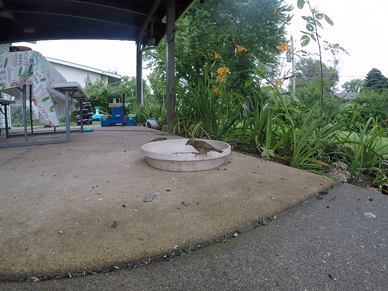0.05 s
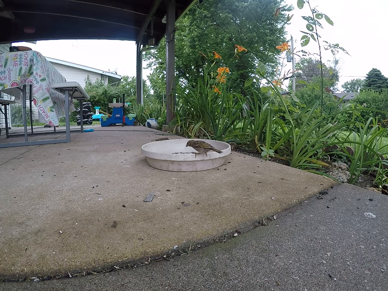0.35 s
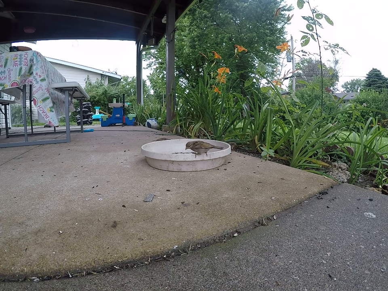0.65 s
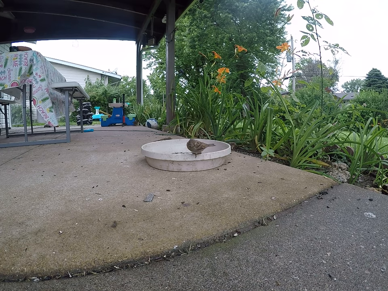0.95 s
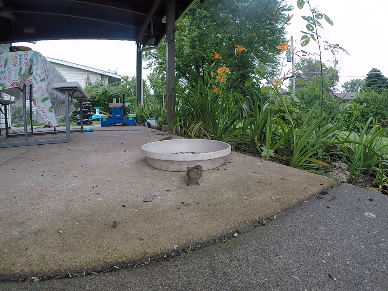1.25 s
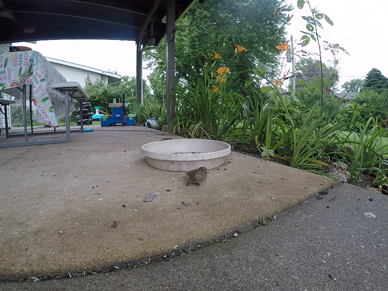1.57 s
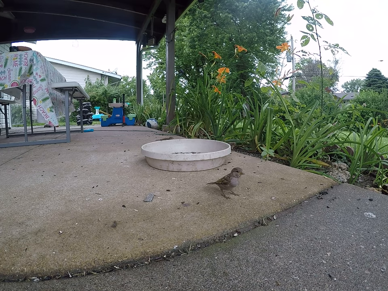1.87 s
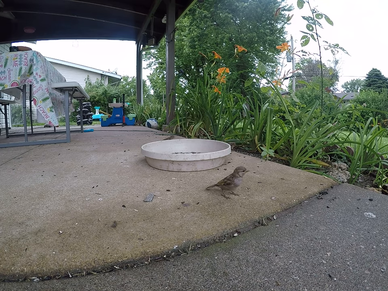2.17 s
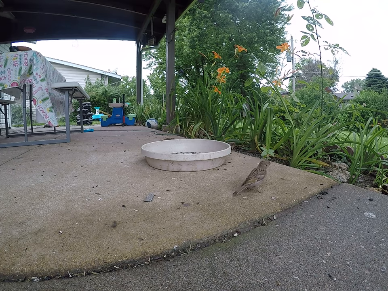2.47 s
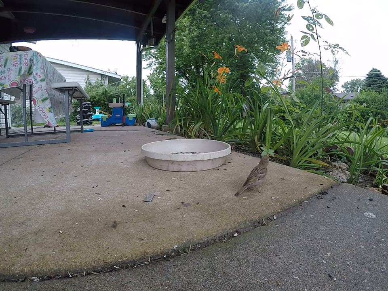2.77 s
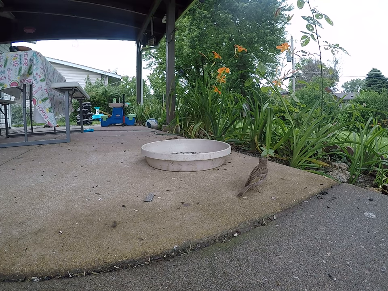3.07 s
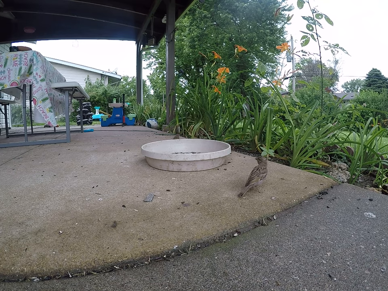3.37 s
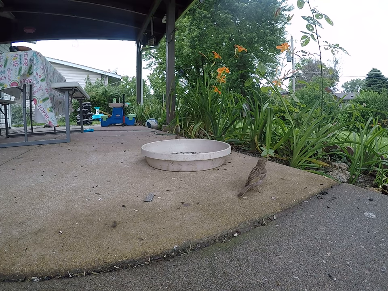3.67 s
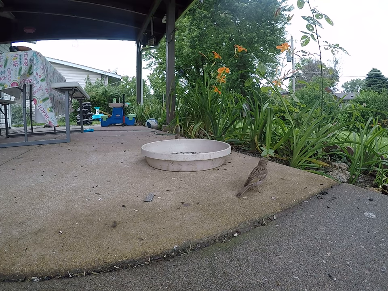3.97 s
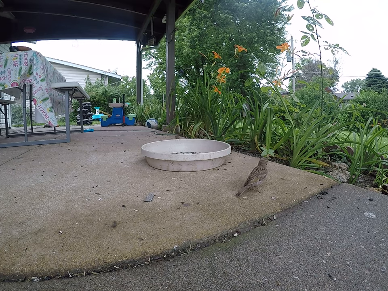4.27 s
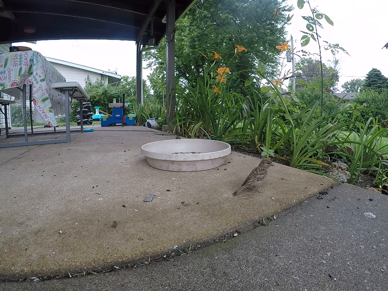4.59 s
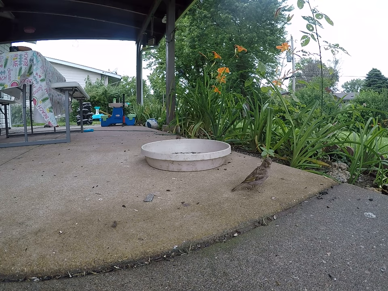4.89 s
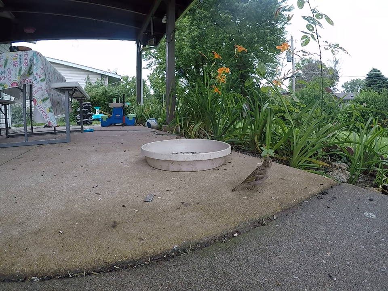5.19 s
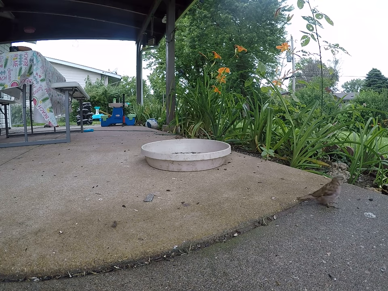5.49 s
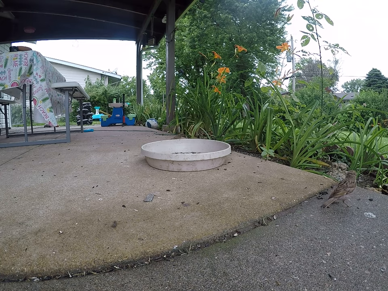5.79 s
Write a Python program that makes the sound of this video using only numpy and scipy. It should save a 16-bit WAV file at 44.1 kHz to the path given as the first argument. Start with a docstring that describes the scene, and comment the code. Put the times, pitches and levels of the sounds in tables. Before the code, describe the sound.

A steady low machine hum and a soft hiss of open air and distant traffic fill a roofed garden patio for about six seconds, with a faint, high electrical whine. Thin bird peeps come from the garden throughout. A small tick sounds at about 0.4 seconds. Sparrows chirp at 1.4 and 1.7 seconds, with a quick, feathery flutter of wings between them. At 1.9 seconds comes the loudest chirp, close and clear, slightly to the right. Softer, hoarser chirps follow at about 2.9, 3.9 and 4.6 seconds, each a tiny rasp and squeak running into a quick whistle. Soft knocks fall near 1.6, 2.7, 4.5 and 5.4 seconds, and another tick at 5 seconds. Faint wing flicks come around 4.4 and 5.5 seconds. The birds echo briefly off the concrete and roof.

```python
"""Sparrows chirp around a water dish on a roofed patio, one close by: the syrinx rasps, squeaks, then whistles
two quick arches while air hisses through the beak. Thinner calls glide in, most from the garden. A bird flicks
its wings in bursts of feather friction and scuffs once as it hops, among a few small ticks and soft knocks. All
these echo off slab, roof and walls. Under them lie a steady low machine hum, the hiss of open air and far
traffic, and a faint pulsing electrical whine."""
import sys
import numpy as np
from scipy import signal
from scipy.fft import rfft, irfft
from scipy.io import wavfile

SR = 44100
rng = np.random.default_rng(int(sys.argv[2]) if len(sys.argv) > 2 else 0)


def materialize(psi):
    """Save the field psi as 16-bit PCM at rate SR to the path in sys.argv[1].

    A 1-D psi becomes a single channel; in a 2-D psi each row is a channel.
    """
    bounded = np.clip(np.atleast_2d(psi).T, -1, 1)
    quanta = np.round(bounded * 32767).astype(np.int16)
    wavfile.write(sys.argv[1], SR, quanta)


N = 261954
TIME_S = np.arange(N) / SR
BINS_HZ = np.maximum(np.arange(N // 2 + 1) * SR / N, 1)


def from_db(db):
    """Decibels to gain."""
    return 10 ** (np.asarray(db) / 20)


def unit_rms(x):
    """Scale to unit power."""
    return x / np.sqrt(np.mean(x ** 2) + 1e-20)


def over_hz(points):
    """Join (hz, value) points on a log-frequency axis."""
    hz, value = np.transpose(points)
    return np.interp(np.log(BINS_HZ), np.log(hz), value)


def white():
    """Spectrum of fresh white noise."""
    return rfft(rng.standard_normal(N))


def flutter(rate_hz):
    """Random wavering up to rate_hz, unit rms."""
    return unit_rms(irfft(white() / (1 + (BINS_HZ / rate_hz) ** 4), N))


def during(start_s, length_s):
    """Sample indices of an event and its progress, 0 to 1."""
    at = np.arange(max(int(start_s * SR), 0), min(int((start_s + length_s) * SR), N))
    return at, np.clip((at / SR - start_s) / length_s, 0, 1)


def phase_of(hz):
    """Running phase of a gliding tone."""
    return 2 * np.pi * np.cumsum(hz) / SR


def bell(x, centre, width):
    """Smooth bump of height 1."""
    return np.exp(-((x - centre) / width) ** 2)


def burst(start_s, rise_s, t60_s):
    """Linear rise, exponential fall."""
    age_s = TIME_S - start_s
    return np.clip(age_s / rise_s, 0, 1) * from_db(-60 * np.clip((age_s - rise_s) / t60_s, 0, 3))


def stereo(left, right, balance, lead):
    """Shade and delay one side against the other; spectra in, sound out."""
    tilt = from_db(over_hz(balance))
    spectra = np.array([left * tilt * np.exp(1j * over_hz(lead)), right])
    return irfft(spectra * np.sqrt(2 / (1 + tilt ** 2)), N)


# diffuse shading: freq_hz, left_minus_right_db
DIFFUSE_BALANCE = [(50, -10), (160, -4), (300, -7), (370, -6.5), (450, -10.5), (600, -4.5), (950, 0.5),
                   (1400, 1), (2500, 1.5), (5500, -4.5), (7500, -1.5), (12000, -0.5)]
# diffuse phase: freq_hz, left_lead_rad
DIFFUSE_LEAD = [(250, -.27), (430, .35), (600, 2.7), (1000, 2.35), (2000, 1.55), (4300, .35), (6000, 2),
                (7500, 3)]
def from_all_around(left, right):
    """Stereo image of diffuse sound."""
    return stereo(left, right, DIFFUSE_BALANCE, DIFFUSE_LEAD)


# left-right likeness: freq_hz, coherence
DIFFUSE_COHERENCE = [(100, 1), (250, 0.77), (520, 0.31), (880, 0.84), (1500, 0.49), (2700, 0.17),
                     (4200, 0.85), (6000, 0.1), (7500, 0.28), (12000, 0.052)]
def diffuse_noise(spectrum, waver_db, waver_hz):
    """Steady noise, partly shared by both sides, its level wavering a little."""
    coherence = over_hz(DIFFUSE_COHERENCE)
    colour = from_db(over_hz(spectrum)) * np.sqrt(SR / 2)
    shared = colour * np.sqrt((1 + coherence) / 2) * white()
    apart = colour * np.sqrt((1 - coherence) / 2) * white()
    return from_all_around(shared + apart, shared - apart) * from_db(waver_db * flutter(waver_hz))


# hum spectrum: freq_hz, density_db
HUM = [(20, -93.5), (110, -95), (124, -89), (143, -60), (180, -62.5), (235, -69.5), (320, -73), (345, -76),
       (367, -65), (405, -75.5), (440, -72), (480, -75), (540, -97), (1600, -140)]
# machine overtones: centre_hz, width_hz, level_db
OVERTONES = [(820, 27, -65), (1202, 55, -61.5), (1484, 25, -67.5)]
def machine(overtone_waver_db=3):
    """A machine hums low; faint narrow overtones come and go above it."""
    hum = diffuse_noise(HUM, waver_db=0.9, waver_hz=19)
    overtones = np.zeros(N)
    for centre_hz, width_hz, level_db in OVERTONES:
        band = unit_rms(irfft(white() / (1 + (2 * (BINS_HZ - centre_hz) / width_hz) ** 2), N))
        overtones += from_db(level_db + overtone_waver_db * flutter(rate_hz=8)) * band
    return hum + from_all_around(rfft(overtones), rfft(overtones))


# outdoor spectrum: freq_hz, density_db
AIR = [(200, -101), (550, -81), (900, -78), (1200, -83.5), (1550, -86), (2200, -90), (4300, -95),
       (5800, -90.5), (7400, -93.5), (8200, -97), (10200, -99), (11200, -105.5), (13800, -111),
       (14700, -123)]
def open_air():
    """Broad hiss of open air and far traffic."""
    return diffuse_noise(AIR, waver_db=1.5, waver_hz=21.8)


def whine(pitch_hz=7775, pulse_hz=60, level_db=-67.5, sharpness=1.1, wander_rad=1.42):
    """A thin electrical tone in rapid pulses of unsteady phase."""
    pulses = np.exp(sharpness * np.cos(2 * np.pi * pulse_hz * TIME_S))
    tone = np.sin(2 * np.pi * pitch_hz * TIME_S + wander_rad * flutter(45))
    return from_db(level_db) * unit_rms(pulses * tone)


def peeps(rows, glide_octaves, undertone=0, jitter=0.177, shimmer_db=4):
    """Single glides; the hoarser the call, the more its pitch and level shake."""
    out, quiver, shimmer = np.zeros(N), flutter(580), flutter(340)
    for start_s, length_s, middle_hz, level_db, hoarseness in rows:
        at, progress = during(start_s, length_s)
        glide_hz = middle_hz * 2 ** (glide_octaves * (progress - 0.5))
        phase = phase_of(glide_hz * (1 + jitter * hoarseness * quiver[at]))
        tone = np.sin(phase) + undertone * np.sin(phase / 2)
        envelope = np.sqrt(np.sin(np.pi * progress).clip(0))
        out[at] += tone * from_db(level_db + shimmer_db * hoarseness * shimmer[at]) * envelope
    return out


def far_calls(count=14, length_s=0.041, centre_hz=5750, spread_octaves=0.12, level_db=-59, hoarse=0.5):
    """Rows for faint calls of far birds, scattered in time and pitch."""
    slot_s = N / SR / count
    return [((k + when) * slot_s, length_s, centre_hz * 2 ** (spread_octaves * (2 * height - 1)),
             level_db, hoarse) for k, (when, height) in enumerate(rng.random((count, 2)))]


# thin calls, both tables: start_s, length_s, middle_hz, level_db, hoarseness; the rising table also holds a low
# tone (1.417 s) that rises into the first chirp
FALLING_CALLS = [(.57, 0.066, 3750, -54, 0.25), (.66, 0.092, 3380, -50.5, 0.53),
                 (.978, 0.049, 5420, -46.5, 0.07), (2.150, 0.016, 5860, -46.5, 0.53),
                 (2.714, 0.013, 5560, -48.5, 0.8), (2.760, 0.011, 5700, -40.5, 1),
                 (3.073, 0.024, 6080, -43, 0.86), (3.2, 0.016, 6520, -41, 0.26),
                 (3.777, 0.025, 6370, -43.5, 0.56), (3.994, 0.0098, 5950, -37.5, 0.34),
                 (5.107, 0.014, 6420, -45, 0.6), (5.125, 0.023, 3750, -52.5, 0.64),
                 (5.303, 0.0215, 4720, -47, 0.5), (5.348, 0.058, 5450, -53, 0.4),
                 (5.478, 0.033, 5110, -53, 0.76), (5.732, 0.023, 5550, -47, 0.63),
                 (5.862, 0.032, 5070, -48.5, 0.36), (5.898, 0.035, 6820, -45, 0.42),
                 (5.902, 0.033, 2330, -50, 0.42)]
RISING_CALLS = [(.091, 0.039, 3710, -49.5, 0.26), (1.417, 0.015, 2260, -47.5, 0.37),
                (1.570, 0.03, 2500, -45.5, 0.54), (2.514, 0.05, 3990, -53.5, 0.3),
                (3.186, 0.017, 6400, -41, 0.14), (4.346, 0.021, 4250, -48, 0.86),
                (4.943, 0.041, 3850, -52, 0.1), (5.602, 0.022, 5900, -46, 0.67)]
def thin_glides():
    """Thin calls; the falling ones carry a weak tone an octave below."""
    falling = peeps(FALLING_CALLS + far_calls(), glide_octaves=-0.354, undertone=from_db(-10.5))
    return falling + peeps(RISING_CALLS, glide_octaves=0.445)


def friction(rows, spectrum, grain_db, tilt_from_hz=3500):
    """Grainy bursts of friction noise, each with its own treble tilt."""
    out, noise = np.zeros(N), white() * from_db(over_hz(spectrum))
    grain = from_db(grain_db * flutter(1000))
    octaves_up = np.log2(np.maximum(BINS_HZ / tilt_from_hz, 1))
    for start_s, rise_s, t60_s, level_db, tilt_db_per_octave in rows:
        tilted = irfft(noise * from_db(tilt_db_per_octave * octaves_up), N)
        out += from_db(level_db) * burst(start_s, rise_s, t60_s) * unit_rms(tilted * grain)
    return out


# ticks: start_s, rise_s, t60_s, level_db, tilt_db_per_octave
TICKS = [(.4465, 0.0006, 0.022, -36, 2), (4.9995, .0004, 0.018, -33, 6)]
# tick spectrum: freq_hz, gain_db
TICK_SPECTRUM = [(150, -50), (1000, -4), (2500, -2), (4000, -3), (6500, 3), (8500, -10), (11000, -29),
                 (15000, -32)]
def ticks():
    """Small hard ticks: very short bursts of bright noise."""
    return friction(TICKS, TICK_SPECTRUM, grain_db=0.5)


def rasp(whistle_start_s, opening_hz, level_db, quiver, shimmer, hiss,
         length_s=0.051, overlap_s=0.011, fall_octaves=0.18, jitter=0.077, shimmer_db=3):
    """Before the whistle locks in, the syrinx shakes irregularly, with most power in the octave."""
    at, progress = during(whistle_start_s + overlap_s - length_s, length_s)
    octave_hz = opening_hz * 2 ** (fall_octaves * (1 - overlap_s / length_s - progress))
    phase = phase_of(octave_hz * (1 + jitter * quiver[at])) / 2
    tone = from_db(-14) * np.sin(phase) + np.sin(2 * phase) + from_db(-28) * np.sin(3 * phase)
    swell = np.sin(np.pi * progress ** 2).clip(0) ** 0.62
    out = np.zeros(N)
    out[at] = (tone + from_db(-11) * hiss[at]) * from_db(level_db + shimmer_db * shimmer[at]) * swell
    return out


def squeak(whistle_start_s, middle_hz, level_db, lead_s=0.0035, length_s=0.0104, rise_octaves=0.44):
    """The rasp snaps into the whistle with a clean upward flick."""
    at, progress = during(whistle_start_s - lead_s, length_s)
    phase = phase_of(middle_hz * 2 ** (rise_octaves * (progress - 0.5)))
    out = np.zeros(N)
    out[at] = from_db(level_db) * np.sin(np.pi * progress) ** 2 * np.sin(phase)
    return out


# syrinx gesture (stage 0-1 rise, 1-2 fall, 2-3 second arch): stage, pitch_hz, effort_db, octave_db
GESTURE = [(0, 2615, -29, -16), (.26, 3658, -3.5, -12), (.48, 4028, -7, 2.5), (1, 4332, -1.5, -7),
           (1.2, 3818, -3.5, 1), (1.45, 3448, -1, -3.5), (1.72, 3262, -7.5, -8), (2, 2195, -18.5, -8),
           (2.099, 2806, -10, 6), (2.36, 3089, 0, -2.5), (2.64, 3272, -1, -3), (2.8, 2790, -6, -5),
           (2.88, 2930, -13.5, -20), (3, 2500, -12, -24)]
def whistle(start_s, shape, hoarse_db, quiver, shimmer, hiss, jitter=0.011, shimmer_db=1.3,
            lift_s=0.00402, break_s=0.0028, fade_s=0.00098, throat_width_hz=1620, beak_cutoff_hz=12000):
    """The syrinx whistles two arches; hoarseness shakes and splits them. Returns tone and breath."""
    lengths_s, pitch_ratio, lifts, end_hz, levels_db, (octave_db, throat_hz) = shape
    shoulder_hz, first_hz, second_hz, swell_db = lifts
    knots, gesture_hz, effort_db, bright_db = np.transpose(GESTURE)
    at, _ = during(start_s, sum(lengths_s))
    t, hoarseness = at / SR, from_db(hoarse_db)
    stages, joints_s = np.arange(4), start_s + np.cumsum([0, *lengths_s])
    stage = np.interp(t, joints_s, stages)

    # the rise bulges or sags; a brief pitch lift tips each arch
    first_s, second_s, break_at_s = np.interp([1, 2.64, 0.95], stages, joints_s)
    first_crest, second_crest = bell(t, first_s, lift_s), bell(t, second_s, lift_s)
    hz = np.interp(stage, knots, [*(pitch_ratio * gesture_hz[:-1]), end_hz])
    hz += shoulder_hz * bell(stage, 0.402, 0.253) + first_hz * first_crest + second_hz * second_crest
    phase = phase_of(hz * (1 + jitter * np.sqrt(hoarseness) * quiver[at]))

    stroke_db = np.interp(stage, [0.84, 1.16, 1.84, 2.16], np.repeat(levels_db, [1, 2, 1]))
    voice_break_db = -8 * bell(t, break_at_s, break_s)
    gain = from_db(stroke_db + np.interp(stage, knots, effort_db)
                   + swell_db * second_crest + voice_break_db)
    tone = gain * np.sin(phase)

    # the octave lights up as it sweeps through the throat resonance
    throat = 1 / (1 + (2 * (2 * hz - throat_hz) / throat_width_hz) ** 2)
    tone += throat * from_db(octave_db + np.interp(stage, knots, bright_db)) * np.sin(2 * phase)

    # the fall is pressed hardest and gains ragged harmonics
    pressed, shake_rad = gain * bell(stage, 2, 0.65), 1.2 * shimmer[at]
    for harmonic, level_db in ((3, -29), (4, -31)):
        beak_damping = 1 / (1 + (harmonic * hz / beak_cutoff_hz) ** 10)
        tone += pressed * from_db(level_db) * beak_damping * np.sin(harmonic * phase + shake_rad)

    # a hoarse voice splits and hisses, high notes hissing more
    strain = hoarseness * np.sqrt(np.mean(gain ** 2))
    tone += strain * from_db(-14) * bell(stage, 1.7, 0.76) * np.sin(1.5 * phase)
    hiss_db = np.interp(stage, stages, [-18.5, -17.5, -19, -28])
    breath = strain * from_db(hiss_db) * (hz / np.mean(hz)) ** 0.77 * hiss[at]

    fade = np.clip(np.minimum(t - t[0], t[-1] - t) / fade_s, 0, 1)
    out = np.zeros((2, N))
    out[:, at] = np.array([tone, breath]) * from_db(shimmer_db * hoarseness * shimmer[at]) * fade
    return out


# chirps: start_s, (rise_s, fall_s, arch_s), pitch_ratio, (shoulder_hz, first_hz, second_hz, swell_db),
# end_hz, (rise_db, fall_db, arch_db), (octave_db, throat_hz), (opening_hz, rasp_db, squeak_db),
# hoarse_db, echo_db
CHIRPS = [(1.435, (0.021, 0.034, .030), 1.05, (131, 150, 0, -7), 3000, (-41, -37, -45), (-45, 7000),
          (5800, -49, -33.5), 5, -4), (1.692, (0.023, 0.029, 0.034), 1.024, (0, 550, 423, 11),
          3200, (-26, -26.5, -32.5), (-36.5, 6350), (5550, -39.5, -29.5), -3, 0),
          (1.926, (.028, 0.025, 0.048), 1.013, (327, 400, 136, 1.3), 1970, (-19.5, -10, -14), (-31.5, 8300),
          (6500, -26.5, -18.5), 0, -9.5), (2.902, (0.025, 0.026, 0.036), 0.98, (113, 312, 590, 4.4),
          2950, (-32, -30.5, -31.5), (-41, 6600), (5900, -40, -46), 5.5, 1), (3.866, (0.025, .025, .042),
          1.0, (106, -6, 700, 10.5), 2720, (-29, -31.5, -34.5), (-33.5, 6540), (6100, -38, -31), 1.5, -1.5),
          (4.562, (0.021, 0.025, 0.039), 1.02, (-100, 420, 348, 2.5), 3100, (-31.5, -30.5, -37),
          (-37, 6700), (6050, -37, -32), 7, -1)]
# air through an open beak: freq_hz, gain_db
BEAK_SPECTRUM = [(1500, -12), (2600, -3), (4700, 11.5), (5600, 2.5), (6800, 8), (8200, -6.5), (10500, -16),
                 (14500, -35)]
def sparrows(opening_echo_db=-7, breath_echo_db=-4, treble_from_hz=6600):
    """Each chirp is a rasp, a squeak and a breathy whistle. Returns (sound, echo_db) pairs."""
    quiver, shimmer = flutter(410), flutter(270)
    rasp_quiver, rasp_shimmer = flutter(970), flutter(480)
    beak = white() * from_db(over_hz(BEAK_SPECTRUM))
    octaves_up = np.log2(np.maximum(BINS_HZ / treble_from_hz, 1))
    sounds = []
    for start_s, *shape, (opening_hz, rasp_db, squeak_db), hoarse_db, echo_db in CHIRPS:
        tilt_db_per_octave = -0.98 * echo_db  # a near, dry call keeps its treble
        hiss = unit_rms(irfft(beak * from_db(tilt_db_per_octave * octaves_up), N))
        opening = rasp(start_s, opening_hz, rasp_db, rasp_quiver, rasp_shimmer, hiss)
        opening += squeak(start_s, opening_hz, squeak_db)
        tone, breath = whistle(start_s, shape, hoarse_db, quiver, shimmer, hiss)
        sounds += [(opening, opening_echo_db), (tone, echo_db), (breath, breath_echo_db)]
    return sounds


# wing strokes and one scuff of a hopping bird (5.478 s), both tables: start_s, rise_s, t60_s, level_db,
# tilt_db_per_octave
FLICKS = [(1.511, 0.004, 0.11, -31.5, 7.5), (1.552, 0.0052, 0.22, -46, 4), (1.595, 0.0017, 0.15, -33.5, 4),
          (4.362, 0.004, 0.11, -49, 23), (5.478, 0.0053, 0.11, -50, 1)]
FOLDS = [(1.512, 0.012, 0.24, -43, 6), (1.596, 0.0077, 0.47, -38.5, 4)]
# feather spectra, both tables: freq_hz, gain_db
FLICK_SPECTRUM = [(120, -58), (600, -10), (2200, -4), (4000, -3), (5100, 5.5), (6000, 4), (6900, 2),
                  (8500, -10), (11000, -23), (14500, -34)]
FOLD_SPECTRUM = [(120, -50), (600, 2), (1400, -3), (2200, 3.5), (4000, 2.5), (6500, -5), (8500, -13),
                 (14500, -38)]
def wings_and_hops():
    """Feathers brush in bright flicks and rustle more dully as the wings fold; a hopping foot scuffs once."""
    return friction(FLICKS, FLICK_SPECTRUM, grain_db=1.5) + friction(FOLDS, FOLD_SPECTRUM, grain_db=5)


# knocks: start_s, t60_s, ring_hz, width_hz, level_db
KNOCKS = [(1.597, 0.22, 640, 150, -45.5), (1.603, 0.19, 843, 107, -37.5), (2.647, 0.1, 1860, 700, -45.5),
          (2.732, 0.37, 510, 800, -39.5), (4.481, 0.083, 400, 150, -33.5), (4.975, 0.12, 1200, 200, -42),
          (5.439, 0.37, 415, 145, -41), (5.468, .1, 2130, 700, -51), (5.487, 0.12, 1440, 500, -43)]
def knocks(rise_s=0.00083):
    """Each soft knock stirs one broad resonance."""
    out, noise = np.zeros(N), white()
    for start_s, t60_s, ring_hz, width_hz, level_db in KNOCKS:
        detuning = (BINS_HZ / ring_hz - ring_hz / BINS_HZ) * ring_hz / width_hz
        ring = unit_rms(irfft(noise / (1 + 1j * detuning) ** 2, N))
        out += from_db(level_db) * burst(start_s, rise_s, t60_s) * ring
    return out


# direct shading: freq_hz, left_minus_right_db
DIRECT_BALANCE = [(500, -13), (1200, 3.5), (2200, -2), (4000, -7.5), (6000, -12), (7800, -1.5), (9200, 5),
                  (14000, 0)]
# direct phase: freq_hz, left_lead_rad
DIRECT_LEAD = [(400, 0.71), (1000, 2.1), (2000, 1.54), (3400, 1.4), (4500, 0.16), (6000, -1.2),
               (8500, -2.25), (12000, 1.5)]
def from_the_right(sound):
    """Direct sound from the birds' side of the patio."""
    return stereo(rfft(sound), rfft(sound), DIRECT_BALANCE, DIRECT_LEAD)


def patio(sound, early_t60_s=0.2, late_t60_s=0.55, late_db=-13, gap_s=0.0045, coherence=0.47,
          roof_trip_s=0.0113, roof_t60_s=0.18, bounce_share=0.08, lowpass_hz=8000, lean_left_db=0.2):
    """Sound bounces between slab and roof, scatters off posts and returns late from walls and trees."""
    t = TIME_S[:SR * 3 // 4]
    decay = from_db(-60 * t / early_t60_s) + from_db(late_db - 60 * t / late_t60_s)
    decay *= np.clip(t / gap_s - 1, 0, 1)
    shared, *sides = rng.standard_normal((3, len(t)))
    noise = np.sqrt(coherence) * shared + np.sqrt(1 - coherence) * np.array(sides)
    scatter = noise * decay / np.linalg.norm(decay)
    bounces = (np.arange(len(t)) % int(roof_trip_s * SR) == 0) * (t > 0) * from_db(-60 * t / roof_t60_s)
    bounces /= np.linalg.norm(bounces)
    response = np.sqrt(1 - bounce_share) * scatter + np.sqrt(bounce_share) * bounces
    response = signal.sosfilt(signal.butter(1, lowpass_hz, fs=SR, output="sos"), response)
    echo = signal.fftconvolve(sound[None], response, axes=1)[:, :N]
    return from_all_around(*rfft(echo * from_db([[lean_left_db], [-lean_left_db]])))


def scene(glide_echo_db=1, tick_echo_db=-17, wing_knock_echo_db=-9):
    """Birds and small noises with their echoes, over hum, air and whine."""
    sources = sparrows() + [(thin_glides(), glide_echo_db),
                            (wings_and_hops() + knocks(), wing_knock_echo_db), (ticks(), tick_echo_db)]
    direct = sum(sound for sound, _ in sources)
    scattered = sum(from_db(echo_db) * sound for sound, echo_db in sources)
    return from_the_right(direct) + patio(scattered) + machine() + open_air() + whine()


def record(dry, cutoff_hz=14700):
    """Steep low-pass."""
    return signal.sosfilt(signal.ellip(12, 0.1, 90, cutoff_hz, fs=SR, output="sos"), dry)


dry = scene()
out = record(dry)
materialize(out)
```